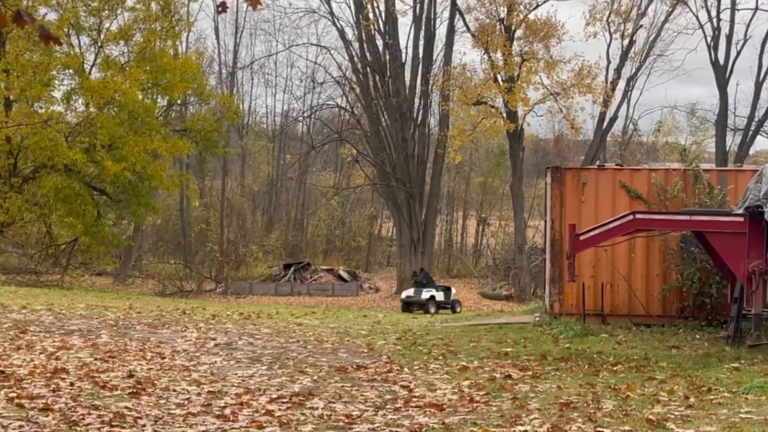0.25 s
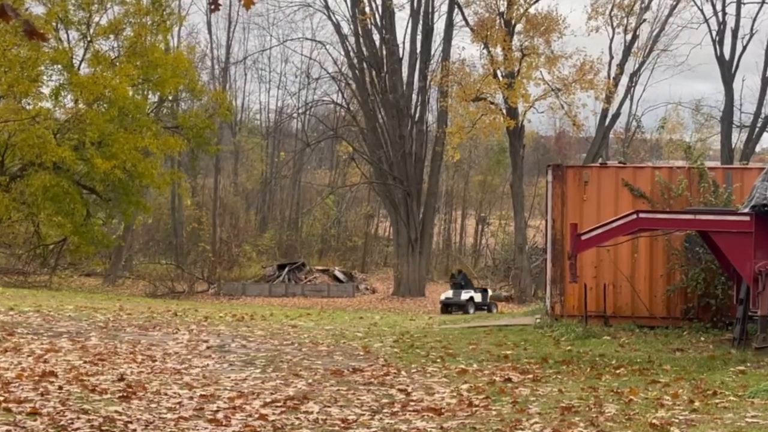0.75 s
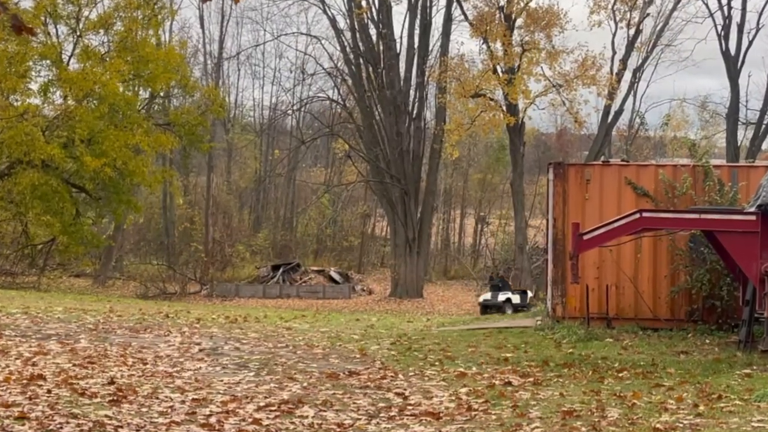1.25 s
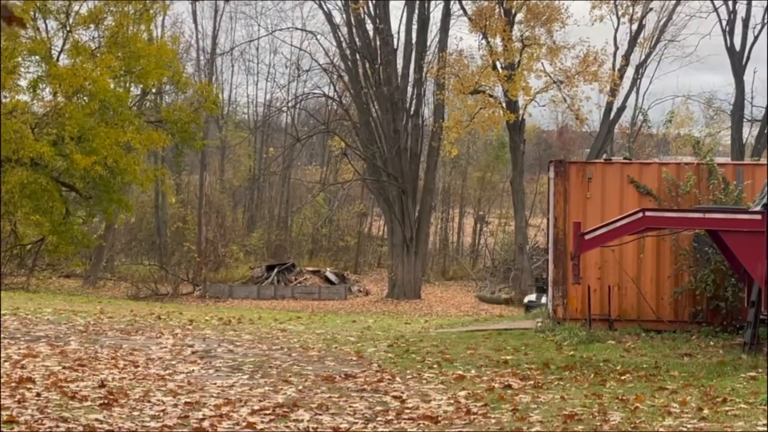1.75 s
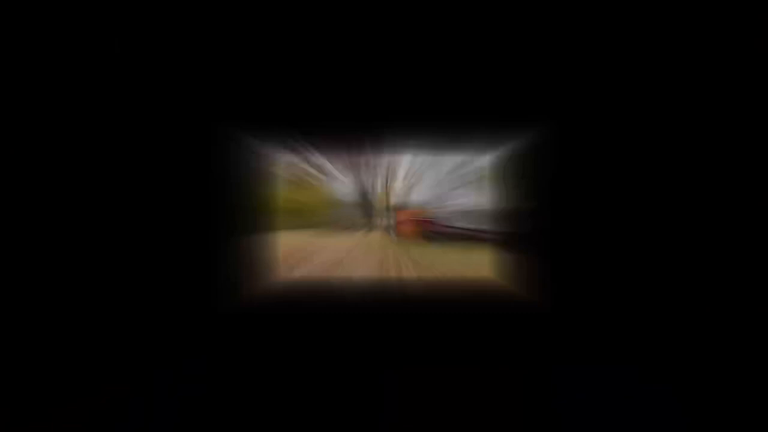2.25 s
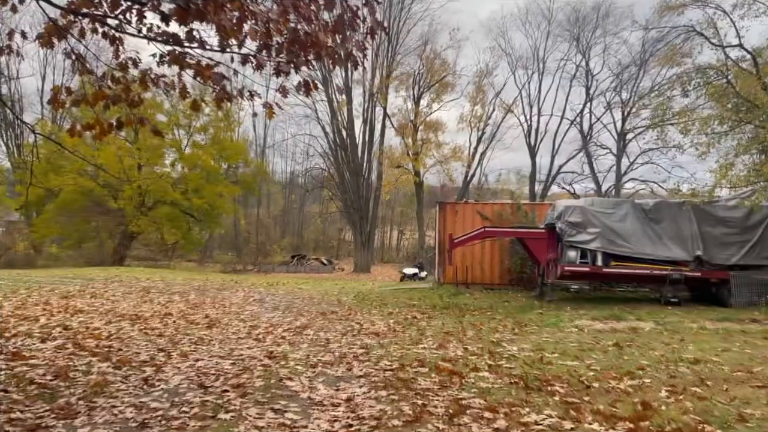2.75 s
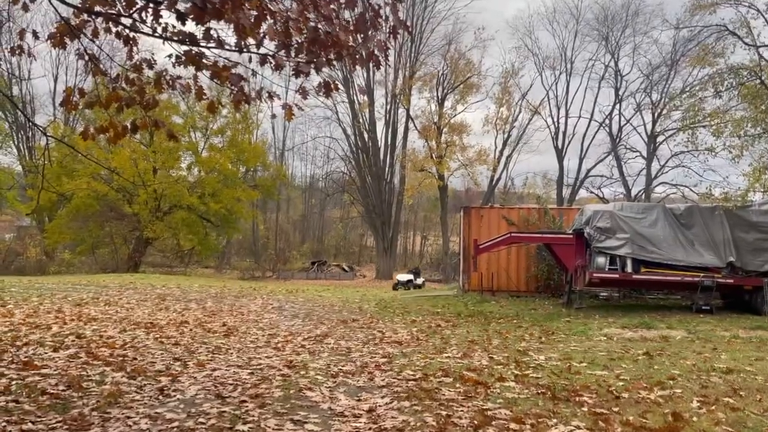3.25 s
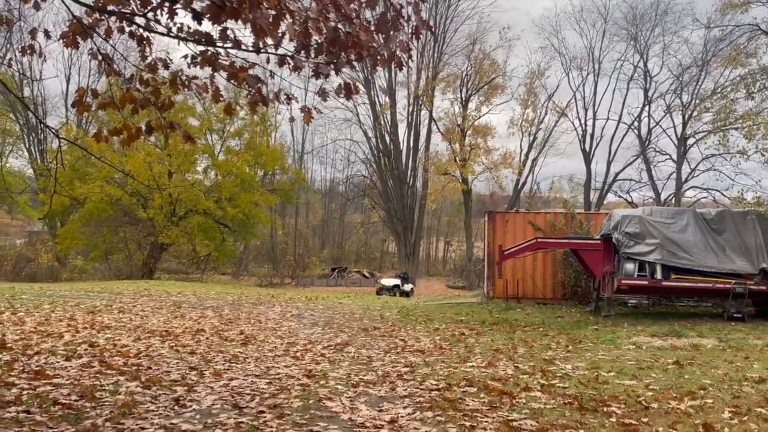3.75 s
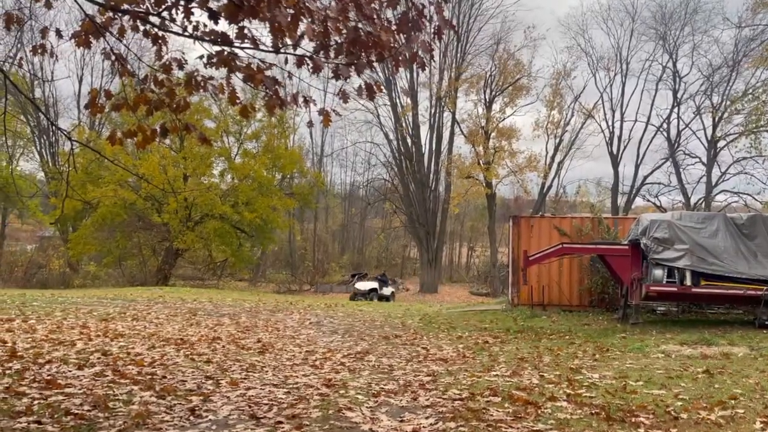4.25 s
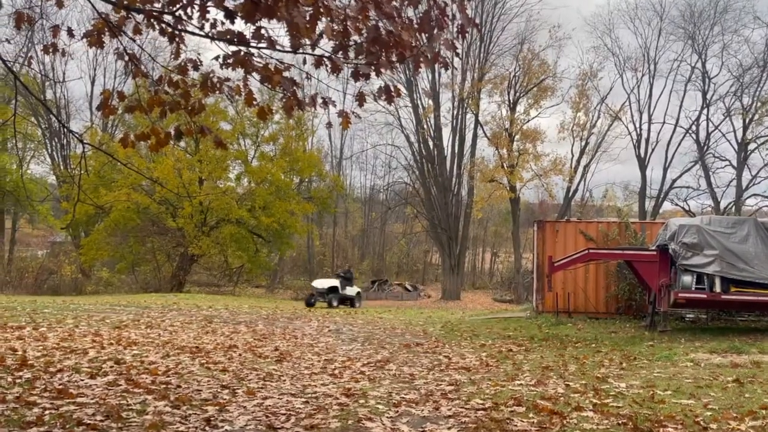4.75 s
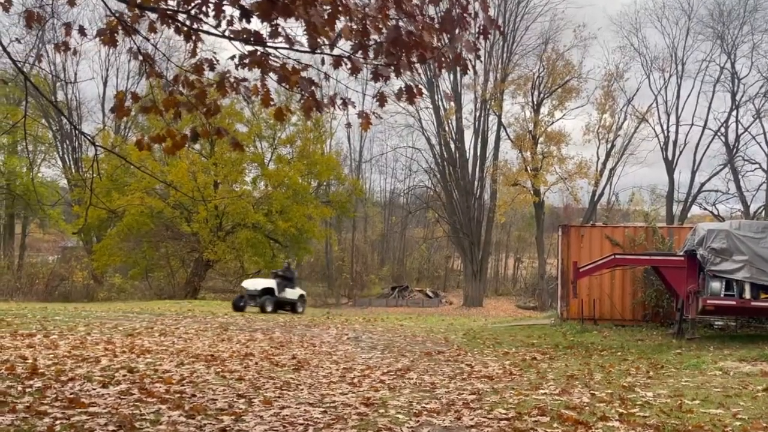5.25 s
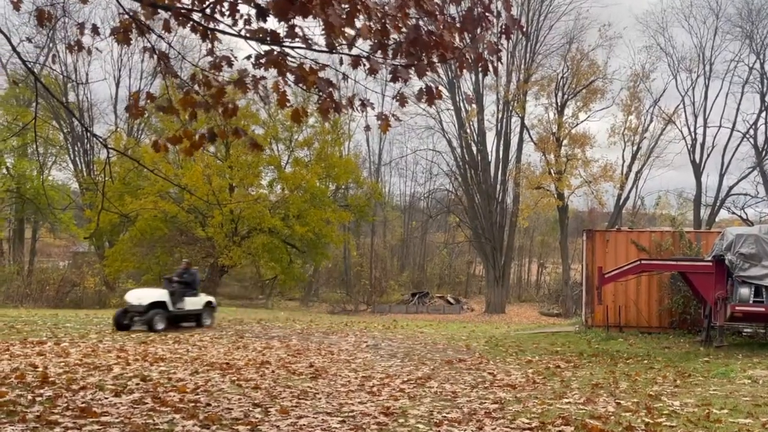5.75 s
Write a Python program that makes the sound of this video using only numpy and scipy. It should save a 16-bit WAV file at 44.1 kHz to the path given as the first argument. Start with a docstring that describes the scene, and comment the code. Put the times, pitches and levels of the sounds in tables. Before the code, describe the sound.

A small petrol cart engine chugs far off in an open yard, over a low rumble and a faint rustle of trees. For the first two seconds its firings are slow and uneven, each with a slight hiss and ping, while muffled pops sound in the exhaust. At about 2.2 seconds a dry tick marks an abrupt change to a faster, steady drone under load, which grows louder and raspier as the cart approaches, slightly left of the microphone. Brief, thin squeaks and a few dull body thumps come and go between 2.6 and 5.4 seconds. From about 4 seconds the tyres crunch more and more audibly through dry leaves. Engine clatter builds from around 4.7 seconds, and a wavering belt whine swells near the end. From 5.4 seconds a loose engine cover knocks in quick succession, with the cart closest at 6 seconds.

```python
"""A small petrol cart engine, driven round a leaf-covered yard. Far off on a light throttle it chugs:
each firing is a thump, a hiss of gas and a ping of the silencer, with muffled pops in the exhaust.
With a tick the sound changes abruptly: the engine drones under load and comes close. Valve gear
clatters, the belt whines, tyres crunch dry leaves, thin squeaks come and go, and bumps thump the body
and knock the loose engine cover. Under it all lie a low open-air rumble and a faint rustle of trees."""
import sys
import numpy as np
from scipy import signal
from scipy.fft import rfft, irfft
from scipy.io import wavfile
from scipy.ndimage import uniform_filter1d

SR = 44100
rng = np.random.default_rng(int(sys.argv[2]) if len(sys.argv) > 2 else 0)


def store_wav(level_fs):
    """Save 16-bit WAV to argv[1]."""
    pcm = np.round(np.clip(np.atleast_2d(level_fs), -1, 1) * 32767)
    wavfile.write(sys.argv[1], SR, pcm.T.astype(np.int16))


N = 264600
TIME = np.arange(N) / SR
FREQS = np.fft.rfftfreq(N, 1 / SR)
CHANGE_S = 2.235  # chug to drone


def undb(db):
    """Decibels to gain."""
    return 10 ** (np.asarray(db) / 20)


def unit(x):
    """Scale to rms 1."""
    return x / np.sqrt(np.mean(x ** 2))


def curves(table):
    """Each column after the first as a line through time."""
    time_s, *columns = np.transpose(table)
    return [np.interp(TIME, time_s, column) for column in columns]


def ramp(start_s, length_s):
    """Linear rise from 0 to 1."""
    return np.clip((TIME - start_s) / length_s, 0, 1)


def swell(age_s, peak_s):
    """Envelope that rises to 1 at peak_s and dies away."""
    return age_s / peak_s * np.exp(1 - age_s / peak_s)


def walk(rate_hz):
    """Random steps at rate_hz, smoothed twice; spread of order 1."""
    hold = int(SR / rate_hz)
    steps = np.repeat(rng.standard_normal(N // hold + 1), hold)
    return 0.947 * uniform_filter1d(uniform_filter1d(steps, hold), hold)[:N]


def colour(points):
    """Gain at every frequency from (freq_hz, gain_db) points."""
    hz, db = np.transpose(points)
    return undb(np.interp(np.log(FREQS + 1), np.log(hz), db))


def resonance(hz, width_hz):
    """Response of one mode, gain 1 at its centre."""
    return 1j * FREQS * width_hz / (hz ** 2 - FREQS ** 2 + 1j * FREQS * width_hz)


# Stereo width, side against mid: freq_hz, gain_db
SIDE_SPECTRUM = [(100, -15), (300, -2), (600, -6), (1100, -2.5), (2500, -8.5), (5000, -11.5), (9000, -42)]

def noise(gain, gate=1):
    """Stereo noise, gated, then coloured; rms 1."""
    mid, side = rfft(rng.standard_normal((2, N)) * gate) * gain
    side = side * colour(SIDE_SPECTRUM)
    return unit(irfft(np.array([mid + side, mid - side]), N))


def count_firings(rate_table, start, wobble):
    """Firing count, near `start` at the table's first time; the crank runs a little unevenly."""
    count = np.cumsum(curves(rate_table)[0]) / SR
    return count - np.interp(rate_table[0][0], TIME, count) + start + wobble * walk(40)


def puffs(firings, rise_cycles, fall_cycles, scatter_db):
    """Envelope that opens once a firing, its strength scattered at random; rms 1."""
    strengths = undb(scatter_db * rng.standard_normal(512))
    strength = strengths[np.floor(firings).astype(int) % 512]
    age = firings % 1
    return unit(strength * (1 - np.exp(-(age / rise_cycles) ** 2)) * np.exp(-age / fall_cycles))


def exhaust(firings, orders, roughness, smear_rad, bounce_rad=0, bounce_cycles=0.291):
    """One wave per order, phased as a pulse ringing a silencer; high orders waver most and lag."""
    multiples, levels_db = np.transpose(orders)
    log_gain = np.log(undb(np.r_[levels_db[0], levels_db, levels_db[-1]]))
    mirrored = np.r_[log_gain, log_gain[-2:0:-1]]
    lags_rad = np.imag(signal.hilbert(mirrored))[1:len(orders) + 1]  # minimum phase
    # reflections in the silencer split each pulse
    lags_rad = lags_rad + bounce_rad * np.sin(2 * np.pi * multiples * bounce_cycles)
    shared_waver = walk(45)
    waves = []
    for k, db, lag_rad in zip(multiples, levels_db, lags_rad):
        waver = 1 + roughness * np.sqrt(k) * (shared_waver + walk(20))
        phase = 2 * np.pi * k * firings - lag_rad - smear_rad * k ** 2
        waves.append(undb(db) * waver * np.cos(phase))
    return np.array(waves)


# Light-throttle exhaust spectrum: order, relative_db
CHUG_ORDERS = [(1, -45), (2, 6.5), (3, 6), (4, 5.5), (5, 4.5), (6, -4.5), (7, 4.5), (8, -8.5), (9, -10),
               (10, -14.5), (11, -18), (12, -20.5), (13, -17.5), (14, -28.5), (15, -29.5), (16, -20.5),
               (17, -30.5), (18, -30.5), (19, -31.5), (20, -36), (21, -32)]
# Its main orders: time_s, second_db, third_db, fourth_db, fifth_db, seventh_db
CHUG_LEVELS = [(0, -44.5, -52.5, -39, -41, -42.5), (.35, -40, -34, -39, -41, -41),
               (.6, -41.5, -46, -39.5, -42.5, -45.5), (.85, -44.5, -50, -38.5, -40, -46.5),
               (1.08, -37.5, -41.5, -40, -43, -46), (1.4, -38.5, -36.5, -57, -52, -43.5),
               (1.6, -44, -46, -53, -42, -46), (1.83, -42, -40, -42.5, -35.5, -48),
               (2.05, -32, -41, -51, -38.5, -47), (2.2, -35, -54, -53, -44, -49)]

def far_exhaust(firings, gain_db=-40.5, fade_db_per_s=3, dull_db_per_s=3):
    """Exhaust pulses; the overtones fade as the cart draws away and dull as the throttle eases."""
    orders = exhaust(firings, CHUG_ORDERS, roughness=0.08, smear_rad=0.01)
    first, second, third, fourth, fifth, sixth, seventh, eighth, *upper = orders
    main = (second, third, fourth, fifth, seventh)
    hum = sum(unit(order) * undb(db) for order, db in zip(main, curves(CHUG_LEVELS)))
    rest = first + sixth + eighth + sum(upper) * undb(6.5 - dull_db_per_s * TIME)
    return hum + rest * undb(gain_db - fade_db_per_s * TIME)


# Engine cover modes: pitch_hz, width_hz, gain_db
COVER_MODES = [(1660, 67, -11), (1843, 92, -11), (2647, 140, -10), (3116, 66, -14.5), (3517, 85, -16),
               (3696, 80, -19), (3905, 120, -13), (4300, 550, -15)]

def cover_ring(flare_db=2.2):
    """The engine cover, shaken at random, rings in its modes, each flaring on its own."""
    return sum(undb(db + flare_db * walk(30)) * noise(resonance(hz, width_hz) ** 2)
               for hz, width_hz, db in COVER_MODES)


# Gas hiss: freq_hz, gain_db
HISS_SPECTRUM = [(600, -16), (1200, -36), (1900, -2), (3200, 1.5), (4500, 6.5), (5300, 1.5), (6000, 3),
                 (7000, -3.5), (8800, 11), (9500, 5), (10300, -20), (12500, -45)]

def gas_hiss(stroke, gain_db=-51.5, shade_db=-7.5):
    """Each stroke hisses and rings the cover; both drop as the cart slips behind a steel container."""
    hiss = noise(colour(HISS_SPECTRUM), stroke) + undb(-16) * cover_ring() * stroke
    return hiss * undb(gain_db + shade_db * ramp(start_s=1.844, length_s=0.25))


# Silencer ping: time_s, level_db
PING_LEVEL = [(0, -71), (.6, -69), (1.15, -60.5), (1.5, -70), (2.2, -72)]

def silencer_ping(stroke, pitch_hz=1866, width_hz=330):
    """Each firing pings the thin silencer shell, clearest side-on."""
    return noise(resonance(pitch_hz, width_hz) ** 2, stroke) * undb(curves(PING_LEVEL)[0])


# Exhaust burble: freq_hz, gain_db
BURBLE_SPECTRUM = [(25, -46), (45, 9), (65, 3), (88, 11), (115, 0.5), (180, -1), (300, -10.5), (500, -27.5),
                   (1000, -49), (8000, -62), (11000, -100)]

def burble(start_db=-41, swell_db=7):
    """Low exhaust noise that swells off throttle."""
    level_db = start_db + swell_db * ramp(start_s=0.93, length_s=2.05)
    return noise(colour(BURBLE_SPECTRUM)) * undb(level_db)


# Light-throttle engine speed: time_s, firing_hz
CHUG_RATE = [(0, 29.8), (0.15, 29.81), (0.25, 28.09), (0.6, 28.24), (0.85, 29.01), (1.4, 29.42),
             (1.85, 29.76), (2.22, 32.58)]
# Strong and weak firings: time_s, change_db
ACCENTS = [(.104, 2.5), (.21, -6), (.243, 3.5), (.279, 1.5), (.312, 3.5), (.35, -6), (.384, 3.5),
           (.422, -5), (.456, 2.5), (.491, 1.5), (.596, 1.5), (.84, 1.5), (.978, -1), (1.013, -2.5),
           (1.149, 2.5), (1.461, -6), (1.728, 1)]

def chugging(accent_s=0.012):
    """Far off on a light throttle: slow, unequal firings over a burble."""
    accent_db = sum(db * np.exp(-((TIME - time_s) / accent_s) ** 2) for time_s, db in ACCENTS)
    firings = count_firings(CHUG_RATE, start=0.92, wobble=0.0037)
    pipe = far_exhaust(firings)
    stroke = puffs(firings + 0.15, rise_cycles=0.15, fall_cycles=0.21, scatter_db=0.6)
    return (pipe + gas_hiss(stroke)) * undb(accent_db) + silencer_ping(stroke) + burble()


# Yard background: freq_hz, gain_db
YARD_SPECTRUM = [(25, -1), (50, 7), (100, 9), (200, 14.5), (400, -4), (700, -0.5), (1200, -5), (2000, -4.5),
                 (4500, -7), (7000, -12), (8800, -2.5), (9700, -6.5), (10400, -70), (13000, -67)]

def yard(level_db=-48):
    """Open air: a low rumble and a faint rustle of trees."""
    return noise(colour(YARD_SPECTRUM)) * undb(level_db + 0.04 * walk(1.5) + 0.1 * walk(24))


# Low thuds: start_s, peak_db, start_hz, end_hz
THUDS = [(0.21, -23, 129, 58.7), (0.357, -25, 151, 58), (0.425, -26, 139, 58), (1.218, -20.5, 277.9, 79.5),
         (1.321, -28, 139, 70), (1.369, -31, 130, 70), (1.464, -26.5, 161, 74), (1.707, -22, 176, 57.7),
         (1.955, -21, 287, 65.6), (2.034, -27, 192, 58), (2.075, -29, 109.4, 58), (2.135, -16, 180, 42),
         (2.86, -26, 100, 50), (3.25, -26, 90, 50), (4.339, -26.5, 140, 55), (4.73, -23.5, 90, 49.5)]

def thuds(sag_s=0.009, peak_s=0.008):
    """Low thuds that fall in pitch: exhaust pops while chugging, body thumps over bumps while droning."""
    out = 0
    for start_s, peak_db, start_hz, end_hz in THUDS:
        age_s = np.maximum(TIME - start_s, 0)
        cycles = end_hz * age_s + (start_hz - end_hz) * sag_s * (1 - np.exp(-age_s / sag_s))
        out = out - undb(peak_db) * swell(age_s, peak_s) * np.sin(2 * np.pi * cycles)
    return out


def tick(gain_db=-21, fall_s=0.0008, highpass_hz=150):
    """A dry tick as the scene changes from the far chug to the near drone."""
    age_s = np.maximum(TIME - CHANGE_S, 0)
    snap = -undb(gain_db) * (age_s > 0) * np.exp(-age_s / fall_s)
    return signal.sosfilt(signal.butter(2, highpass_hz, "high", fs=SR, output="sos"), snap)


def distance_m(speed_m_s=5.18, nearest_m=4.6, nearest_s=7.38):
    """Cart to microphone, on a straight approach at steady speed."""
    return np.hypot(nearest_m, speed_m_s * (nearest_s - TIME))


def approach_db(at_10m_db, per_doubling_db):
    """Gain of one part of the cart, a fixed step lower for each doubling of distance."""
    return at_10m_db - per_doubling_db * np.log2(distance_m() / 10)


def with_ground_echo(sound, share=0.6, source_height_m=0.61, mic_height_m=1.49, sound_m_s=343):
    """The echo off the ground cuts notches that sink as the cart nears."""
    lag_s = 2 * source_height_m * mic_height_m / distance_m() / sound_m_s
    return sound + share * np.interp(TIME - lag_s, TIME, sound)


# Echo off a nearby wall: time_s, lag_s, share
WALL_ECHO = [(4.8, .0104, 0), (5.3, .0108, .65), (5.62, .0121, .8), (5.85, .013, .75), (6.0, .0143, .7)]

def with_wall_echo(sound):
    """The wall echo lags more as the cart nears, so a comb of notches sweeps down."""
    lag_s, share = curves(WALL_ECHO)
    return sound + share * np.interp(TIME - lag_s, TIME, sound)


# Tailpipe rasp against the bark: time_s, relative_db
RASP_LEVEL = [(2.25, -16), (4.3, -10), (4.7, -7), (5.05, -7.5), (5.25, -4), (5.45, -17), (6.0, -8)]

def tailpipe_rasp(firings, centre_hz=525, width_hz=450):
    """Gas rasps at the tailpipe with each firing and echoes off ground and wall."""
    stroke = puffs(firings - 0.4, rise_cycles=0.1, fall_cycles=0.25, scatter_db=1.5)
    rasp = noise(resonance(centre_hz, width_hz) ** 3, stroke)
    echoed = np.array([with_wall_echo(with_ground_echo(channel)) for channel in rasp])
    return unit(echoed) * undb(curves(RASP_LEVEL)[0])


# Loaded exhaust spectrum: order, relative_db
DRONE_ORDERS = [(1, -10.5), (2, 9), (3, 5), (4, -8.5), (5, -8), (6, -14), (7, -17.5), (8, -15), (9, -17),
                (10, -19), (11, -30), (12, -26.5), (13, -24.5), (14, -34), (15, -38), (16, -34),
                (17, -36.5), (18, -37.5)]
# Its main orders: time_s, first_and_second_db, third_db, fifth_db, sixth_db
DRONE_LEVELS = [(2.25, -26, -29.5, -43.5, -36), (2.4, -24, -25.23, -49, -40.5),
                (2.85, -24.5, -25, -38.5, -38), (2.92, -27.5, -27.5, -42, -39),
                (3.52, -24.5, -22, -37.5, -35.5), (3.6, -22.5, -22.5, -35.5, -32.5),
                (3.75, -25, -20, -34.5, -29), (4.5, -20.5, -19, -36, -34), (4.8, -19, -17.5, -32, -27),
                (4.88, -24.5, -16.5, -41, -29), (5.32, -21.5, -17.5, -29.5, -25), (5.7, -18, -16, -25, -31),
                (6.0, -17, -18, -33, -20)]
# Its fourth order: time_s, level_db
FOURTH_LEVEL = [(2.25, -42), (3.0, -39), (3.45, -34), (4.75, -35), (5.0, -45.5), (6.0, -39.5)]
# Exhaust gas rumble: freq_hz, gain_db
RUMBLE_SPECTRUM = [(25, -38), (40, 1), (55, 5.5), (90, -0.5), (180, -3.5), (300, -6.5), (500, -23),
                   (700, -19.5), (1300, -65), (11000, -110)]

def droning(firings, bark_build_db=12.5, edge_build_db=20, build_s=1.4):
    """Loaded exhaust: low orders swell and fade as the cart moves; a bark builds with the load."""
    boom_db, third_db, fifth_db, sixth_db = curves(DRONE_LEVELS)
    fourth_db = curves(FOURTH_LEVEL)[0]
    slack = 1 - ramp(CHANGE_S, build_s)
    bark_db = approach_db(at_10m_db=-31.5, per_doubling_db=5.56) - bark_build_db * slack
    orders = exhaust(firings, DRONE_ORDERS, roughness=0.085, smear_rad=0.04, bounce_rad=1.0)
    first, second, third, fourth, fifth, sixth, *upper = orders
    boom = unit(first + second) * undb(boom_db) + unit(third) * undb(third_db)
    body = unit(fourth) * undb(fourth_db) + unit(fifth) * undb(fifth_db) + unit(sixth) * undb(sixth_db)
    growl = sum(upper[:4])
    edge = sum(upper[4:]) * undb(-edge_build_db * slack)
    bark = with_wall_echo(unit(with_ground_echo(growl + edge))) + tailpipe_rasp(firings)
    stroke = puffs(firings, rise_cycles=0.21, fall_cycles=0.98, scatter_db=0)
    rumble = noise(colour(RUMBLE_SPECTRUM), stroke) * undb((third_db + bark_db) / 2 - 6.5)
    return boom + body + bark * undb(bark_db) + rumble


# Valve gear and fan: freq_hz, gain_db
CLATTER_SPECTRUM = [(600, -39), (1000, -11), (1300, 1.5), (1600, 3), (2200, 1), (3000, 0.5), (3900, -4.5),
                    (4600, 0.5), (5500, -4.5), (7000, -6.5), (9000, -40), (11000, -68)]

def clatter(firings, flank_db=11):
    """Valve gear and fan throb and ring the cover, louder as the open flank turns to the microphone."""
    flicker = undb(1.5 * walk(25))
    rush = noise(colour(CLATTER_SPECTRUM)) * undb(approach_db(at_10m_db=-46.5, per_doubling_db=3))
    ring = cover_ring() * undb(approach_db(at_10m_db=-47.5, per_doubling_db=5.7))
    throb = 1 + 0.038 * np.cos(2 * np.pi * (firings - 0.5))
    return (rush * flicker + ring) * throb * undb(flank_db * ramp(start_s=4.73, length_s=1.09))


# Drive belt: time_s, pitch_hz, tone_db, octave_db
BELT_WHINE = [(2.25, 1600, -65, -75), (2.95, 1595, -63.5, -68), (3.25, 1590, -59.5, -64.5),
              (3.55, 1585, -59.5, -63.5), (3.8, 1650, -61.5, -73), (4.5, 1660, -65, -75),
              (5.1, 1660, -59, -70), (5.65, 1665, -48, -57), (5.76, 1665, -50, -57), (5.93, 1668, -44, -57),
              (6.0, 1675, -35, -57)]

def belt_whine(waver_hz=30, flutter_db=3):
    """The drive belt sings: a wavering, fluttering tone and its rougher octave."""
    pitch_hz, tone_db, octave_db = curves(BELT_WHINE)
    phase = 2 * np.pi * np.cumsum(pitch_hz + waver_hz * walk(220)) / SR
    tone = undb(tone_db + flutter_db * walk(60)) * np.sin(phase)
    octave = undb(octave_db + flutter_db * walk(60)) * np.sin(2 * phase)
    return np.sqrt(2) * (tone + octave)


# Rolling tyres: freq_hz, gain_db
TYRE_SPECTRUM = [(250, -6.5), (450, 1.5), (600, -12), (800, -1), (1100, -3), (1400, -21), (2200, -41),
                 (5000, -59), (11000, -88)]

def tyres(carpet_db=10):
    """Soft tyres roll over turf, louder once they reach a carpet of leaves."""
    roll = unit(np.array([with_ground_echo(channel) for channel in noise(colour(TYRE_SPECTRUM))]))
    surface_db = carpet_db * ramp(start_s=4.3, length_s=0.45) + 0.93 * walk(15)
    return roll * undb(approach_db(at_10m_db=-48, per_doubling_db=2.2) + surface_db)


# Dry leaves: freq_hz, gain_db
LEAF_SPECTRUM = [(1500, -10), (3500, -3), (5000, -6), (7000, -6.5), (8200, 0.5), (9000, 2), (9700, -6.5),
                 (10400, -29.5), (11500, -12.5), (13000, -46)]
# Louder crunches: peak_s, level_db
CRUNCHES = [(4.165, -48), (4.44, -44), (4.66, -41), (4.715, -39), (4.80, -41), (4.86, -38.5), (4.945, -39),
            (5.17, -41), (5.39, -39), (5.665, -38)]

def leaves(firings, cracks_per_s=1300, crush_s=0.011):
    """Tyres crush dry leaves into tiny cracks and louder crunches, over each exhaust stroke's hiss."""
    level_db = approach_db(at_10m_db=-39, per_doubling_db=11.45)
    cracks = rng.random(N) < cracks_per_s / SR
    crunches = sum(undb(db) * np.exp(-np.abs(TIME - peak_s) / crush_s) for peak_s, db in CRUNCHES)
    force = undb(level_db - 2 + 2.8 * walk(40)) + crunches
    hiss = noise(colour(LEAF_SPECTRUM)) * (1 + 0.3 * np.cos(2 * np.pi * (firings - 0.3)))
    return noise(colour(LEAF_SPECTRUM), cracks) * force + hiss * undb(level_db + 0.5 * walk(48))


# Thin squeaks: start_s, length_s, level_db, start_hz, end_hz
SQUEAKS = [(2.62, .07, -55, 4900, 4480), (3.68, .12, -55, 7740, 7740), (3.95, .12, -54, 8093, 8093),
           (4.14, .05, -47, 7740, 7740), (4.42, .08, -45, 7740, 7740), (4.69, .05, -50, 7740, 7740),
           (4.93, .11, -52, 7740, 7740), (5.37, .04, -49, 7760, 7760)]

def squeaks(waver_hz=35):
    """Brief, thin whistles that swell and die."""
    out = 0
    for start_s, length_s, level_db, start_hz, end_hz in SQUEAKS:
        progress = np.clip((TIME - start_s) / length_s, 0, 1)
        pitch_hz = start_hz + (end_hz - start_hz) * progress + waver_hz * walk(370)
        tone = np.sqrt(2) * np.sin(2 * np.pi * np.cumsum(pitch_hz) / SR)
        out = out + undb(level_db) * np.sin(np.pi * progress) * tone
    return out


# Knocks of the loose cover: start_s, gain_db, focus_hz
COVER_KNOCKS = [(5.385, -35, 1700), (5.571, -24, 1900), (5.612, -19.5, 2300), (5.66, -23, 3600),
                (5.816, -19, 2000), (5.883, -23.5, 1670), (5.901, -22, 2640), (5.918, -22, 3700),
                (5.939, -21.5, 2620), (5.973, -21, 1670), (5.986, -21.5, 4400)]

def cover_knocks(falloff_db_per_octave=16, length_s=0.08, grit_cycles=0.02):
    """Bumps knock the loose cover; each gritty knock favours the modes near one pitch."""
    out = np.zeros(N + SR)
    age_s = np.arange(int(length_s * SR)) / SR
    for start_s, gain_db, focus_hz in COVER_KNOCKS:
        start = int(start_s * SR)
        for hz, width_hz, mode_db in COVER_MODES:
            gain = undb(gain_db + mode_db - falloff_db_per_octave * abs(np.log2(hz / focus_hz)))
            cycles = hz * age_s + rng.random() + grit_cycles * np.cumsum(rng.standard_normal(len(age_s)))
            envelope = swell(age_s, peak_s=1 / (np.pi * width_hz))
            out[start:start + len(age_s)] += gain * envelope * np.sin(2 * np.pi * cycles)
    return out[:N]


# Loaded engine speed: time_s, firing_hz
DRONE_RATE = [(2.25, 47.23), (2.86, 46.12), (2.96, 46.72), (3.36, 46.58), (3.67, 47.82), (3.87, 46.85),
              (3.97, 48.07), (4.18, 46.95), (4.38, 47.72), (4.99, 47.2), (5.09, 48.57), (5.39, 45.49),
              (5.49, 46.9), (5.7, 46.48), (5.8, 47.72), (6.0, 46.5)]

def scene():
    """The far chugging gives way to the approaching drone."""
    firings = count_firings(DRONE_RATE, start=0.74, wobble=0.0014)
    near = droning(firings) + clatter(firings) + belt_whine() + cover_knocks()
    near = near + tyres() + leaves(firings)
    return np.where(TIME < CHANGE_S, chugging(), near) + thuds() + squeaks() + tick() + yard()


# Microphone balance: freq_hz, left_minus_right_db
BALANCE = [(60, -1.5), (110, 5.5), (200, 2), (360, 6), (650, 9.5), (1180, 6.5), (2140, 5), (3890, 4.5),
           (7000, 3), (9000, 0)]

def record(dry, right_lag_s=22e-6, lowpass_hz=12900):
    """The left microphone hears it slightly sooner, with more midrange; the top is cut."""
    balance = colour(BALANCE)
    pair = np.array([balance, np.exp(-2j * np.pi * FREQS * right_lag_s)]) * 2 / (1 + balance)
    heard = irfft(rfft(dry) * pair, N)
    return signal.sosfilt(signal.ellip(8, 0.2, 70, lowpass_hz, fs=SR, output="sos"), heard)


dry = scene()
out = record(dry)
store_wav(out)
```